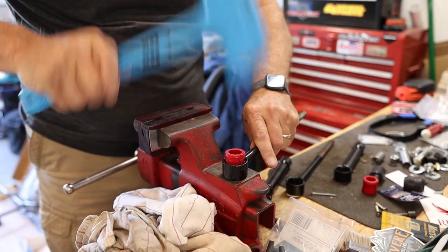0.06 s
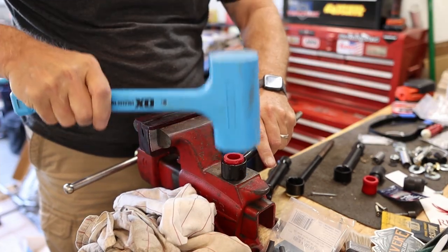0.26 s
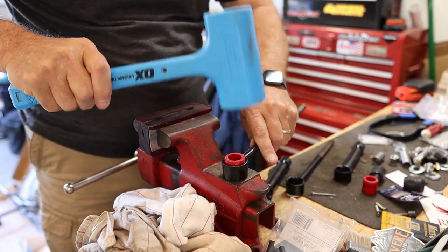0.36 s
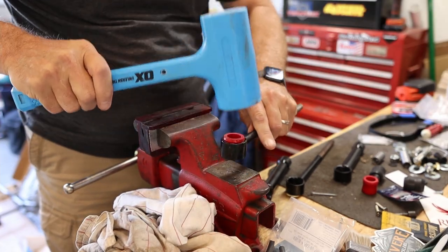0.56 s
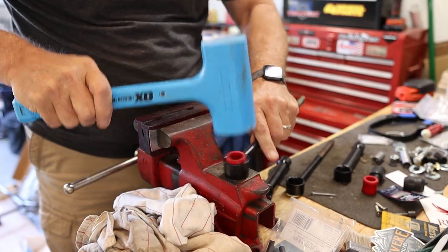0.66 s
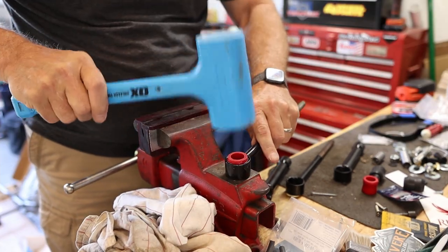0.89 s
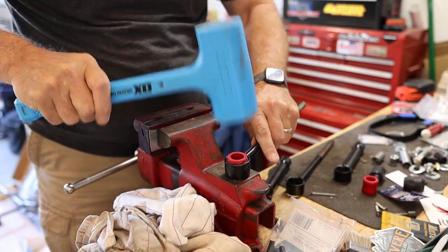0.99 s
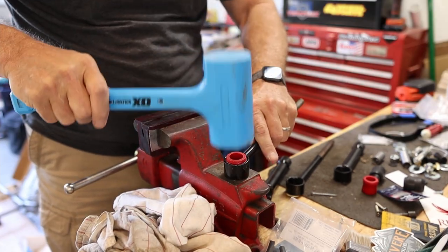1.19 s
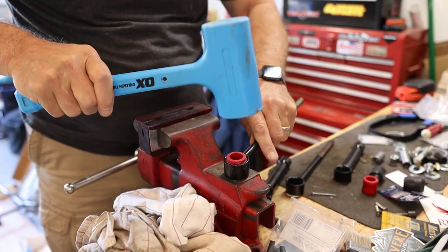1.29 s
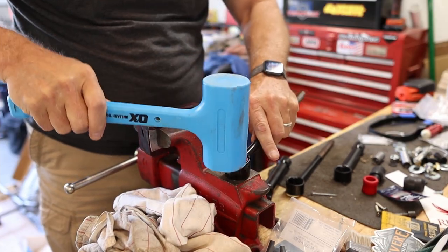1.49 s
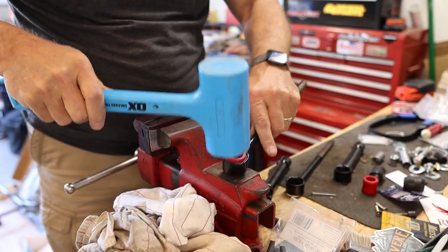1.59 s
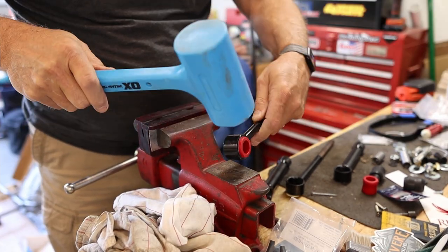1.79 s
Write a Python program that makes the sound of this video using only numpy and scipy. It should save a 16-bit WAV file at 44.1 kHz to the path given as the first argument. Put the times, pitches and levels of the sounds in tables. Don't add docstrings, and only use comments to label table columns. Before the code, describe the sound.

Hammer blows on a part clamped in a bench vise, close up in a small workshop. Shot hisses on the down-swing before a heavy, wooden thump at 0.2 s, with loud chatter and bouncing tools. A metallic clank at 0.77 s gets a dull rebound at 0.83 s. Sharp plastic cracks follow at 1.16 and 1.52 s, each trailing rattles and small knocks over faint room hum.

```python
import sys
import numpy as np
from scipy import signal
from scipy.fft import rfft, irfft
from scipy.io import wavfile

SR = 44100
rng = np.random.default_rng(int(sys.argv[2]) if len(sys.argv) > 2 else 0)


def boost(x):
    u = np.asarray(x, float) / 20
    return 10 ** u


def store_pcm(level_fs):
    pcm = np.round(np.clip(level_fs, -1, 1) * 32767).astype(np.int16)
    wavfile.write(sys.argv[1], SR, np.atleast_2d(pcm).T)


N = 81585

BLOW_SPREAD_DB, BOUNCE_SPREAD_DB = 1.5, 3
VISE_T60_S, TOOL_T60_S = .035, .009


def rms_one(x):
    return x / np.sqrt(np.mean(x ** 2) + 1e-20)


def at_hz(points, hz):
    table_hz, value = np.transpose(points)
    return np.interp(np.log(hz + 1), np.log(table_hz), value)


def low_pass(x, hz):
    return signal.sosfilt(signal.butter(4, min(hz, .45 * SR), fs=SR, output="sos"), x)


def high_pass(x, hz, order=2):
    return signal.sosfilt(signal.butter(order, hz, "high", fs=SR, output="sos"), x)


def band_pass(x, low_hz, high_hz):
    return signal.sosfilt(signal.butter(2, [low_hz, high_hz], "band", fs=SR, output="sos"), x)


def coloured(spectrum):
    hz = np.arange(N // 2 + 1) * SR / N
    return rms_one(irfft(rfft(rng.standard_normal(N)) * boost(at_hz(spectrum, hz)), N))


def clicks(start_s, level_db):
    out = np.full(N, 1e-18)
    out[(np.asarray(start_s) * SR).astype(int)] += boost(level_db)
    return out


def ring(x, hz, t60_s):
    r = boost(-60 / (max(t60_s, .002) * SR))
    w = 2 * np.pi * hz / SR
    return signal.lfilter([0, np.sin(w)], [1, -2 * r * np.cos(w), r * r], x)


def capped(modes, longest_s):
    return [(hz, db, min(t60_s, longest_s)) for hz, db, t60_s in modes]


def strike(start_s, level_db, modes, spread_db):
    vary_db = rng.normal(0, 1, (len(start_s), len(modes))) * spread_db
    out = 0
    for k, (hz, mode_db, t60_s) in enumerate(modes):
        out = out + ring(clicks(start_s, level_db + mode_db + vary_db[:, k]), hz, t60_s)
    return out


def body(x, modes):
    out = 0
    for k, (hz, db, t60_s) in enumerate(capped(modes, VISE_T60_S)):
        out = out + ring(x + 1e-18, hz, t60_s) * boost(db) * (-1) ** k
    return out


def contacts(modes):
    contacts_per_s = 1500
    train = rng.choice([-1, 1], N) * (rng.random(N) < contacts_per_s / SR)
    return train / np.sqrt(np.mean(body(train, modes) ** 2))


def swell(start_s, rise_s, t60_s, level_db):
    age_s = np.maximum(np.arange(N) / SR - start_s, 0)
    return boost(level_db - 60 * age_s / t60_s) * np.sin(np.pi / 2 * np.minimum(age_s / rise_s, 1)) ** 2


# hz, level_db
HUM_SPECTRUM = [(25, -2.5), (50, 2.5), (85, -10.5), (250, -6.5), (1030, -7.5), (2300, -13), (3600, -24),
                (16500, -44)]


def hum():
    return boost(-52) * coloured(HUM_SPECTRUM)


# start_s, peak_db
TICK_EVENTS = [(.3185, -35), (.3985, -33), (.432, -52), (.4505, -54), (.6045, -45), (.6545, -41),
               (.7025, -44), (.009, -50)]
# hz, level_db, t60_s
TICK_MODES = [(2700, -9, .006), (3700, -11, .005), (4700, -12, .004), (5600, -7, .006), (6800, -8, .005),
              (7700, -12, .004)]


def ticks():
    start_s, peak_db = np.transpose(TICK_EVENTS)
    return low_pass(strike(start_s, peak_db, capped(TICK_MODES, TOOL_T60_S / 1.4), BLOW_SPREAD_DB), 8200)


# peak_s, rise_s, fall_s, level_db, brightness_db
SHOT_SLIDES = [
    (0.128, 0.024, 0.018, -42.5, 3.5),
    (1.151, 0.048, .004, -55, 0.5),
    (1.508, 0.033, .004, -60, -18),
    (.52, 0.0078, 0.0067, -54.5, -38),
    (.212, 0.0057, 0.0036, -38.5, 2),
    (.11, 0.083, .05, -53.5, -15),
]
# hz, level_db
SHOT_SPECTRUM = [(410, -47), (700, -13), (2190, -3.5), (2400, 0.5), (2800, -9.5), (5260, -5.5),
                 (6920, -18.5), (9480, -14.5), (16000, -11.5)]


def shot():
    cavity_hz, cavity_width_hz, cavity_db = 2430, 250, -11
    grain_db, grain_hz = 3, 120
    t, out = np.arange(N) / SR, 0
    hiss = coloured(SHOT_SPECTRUM)
    hiss = hiss + boost(cavity_db) * rms_one(ring(hiss, cavity_hz, 2.2 / cavity_width_hz))
    hiss = hiss * boost(grain_db * rms_one(low_pass(rng.standard_normal(N), grain_hz)))
    dull = low_pass(hiss, 6600)
    for peak_s, rise_s, fall_s, level_db, bright_db in SHOT_SLIDES:
        width_s = np.where(t < peak_s, rise_s, fall_s)
        swing = boost(level_db) * np.exp(-.5 * ((t - peak_s) / width_s) ** 2)
        out = out + swing * dull + swing ** 2 / boost(level_db - bright_db) * (hiss - dull)
    return out


# full_contact_s, thump_db (bench), face_db (crack), steel_db (sleeve clank)
HAMMER_BLOWS = [
    (.2050, -3, -16, -15),
    (0.7705, -21, -12.5, 1),
    (0.8332, -9, -26, -21),
    (1.1554, -6.5, -0.5, -13),
    (1.5172, -8.5, -1.5, -14),
]
# hz, level_db, t60_s
BENCH_MODES = [(139.8, -18.5, 0.14), (215.3, -13, 0.078), (245.8, 2, 0.046), (328.8, -7.5, 0.055),
               (566.6, -11, .06)]
# hz, level_db, t60_s
FACE_MODES = [(1126, -0.5, 0.015), (1760, 3.5, 0.0078), (2500, 2, 0.0048), (4795, -0.5, .016),
              (5910, -3.5, 0.0094), (6800, -6, 0.0045), (8700, -1, 0.0027), (10620, -26, 0.0033),
              (10740, -15.5, .01), (13800, -16, .008), (15800, -24, .01)]
# hz, level_db, t60_s
STEEL_MODES = [(1133, -6, 0.032), (2174, 6.5, 0.0092), (2370, -0.5, 0.011), (3431, -4, 0.022),
               (4870, -7, 0.02), (5610, 0.5, 0.011), (6270, -9.5, 0.0057), (7440, -9.5, 0.0033),
               (580, -30, 0.0209), (8000, -17.5, .015), (9600, -31.5, 0.029), (10640, -12, 0.018),
               (13800, -12, .012)]


def first_touch(x):
    lead_s, touch_db = .0006, -17
    return x + boost(touch_db) * np.roll(x, -int(lead_s * SR))


def bench_thump(start_s, thump_db):
    lag_s, contact_hz, low_hz = 0.00028, 720, 107
    thump = strike(start_s + lag_s, thump_db, BENCH_MODES, BLOW_SPREAD_DB)
    return high_pass(low_pass(thump, contact_hz), low_hz)


def floor_rumble(start_s, thump_db):
    hz, t60_s, level_db = 69, .4, -29.5
    once = ring(clicks(start_s, thump_db + level_db), hz, t60_s)
    return ring(once, hz, t60_s) * 7 / (t60_s * SR)


def face_crack(start_s, face_db):
    crack = strike(start_s, face_db - 4.5, capped(FACE_MODES, .013), BLOW_SPREAD_DB)
    return high_pass(first_touch(crack), 300)


def sleeve_clank(start_s, steel_db):
    longest_s, contact_hz = .016, 9600
    modes = []
    for k, (hz, db, t60_s) in enumerate(STEEL_MODES):
        modes.append((hz, db, min(t60_s, longest_s * (2.5 if k == 3 else 1))))
    clank = low_pass(strike(start_s, steel_db - 6.5, modes, BLOW_SPREAD_DB), contact_hz)
    return high_pass(first_touch(clank), 300)


def blows():
    start_s, thump_db, face_db, steel_db = np.transpose(HAMMER_BLOWS)
    thump = bench_thump(start_s, thump_db)
    rumble = floor_rumble(start_s, thump_db)
    return face_crack(start_s, face_db), sleeve_clank(start_s, steel_db) - thump + rumble


# start_s, rise_s, t60_s, level_db, top_hz
CHATTER_SWELLS = [
    (0.2065, 0.0019, 0.078, -8.5, 2200),
    (0.243, .03, 0.31, -22.5, 2400),
    (0.768, 0.00094, 0.056, -21, 3000),
    (.832, 0.007, 0.1, -14.5, 1800),
    (1.1525, 0.0027, 0.11, -16.5, 2200),
    (1.191, 0.0069, 0.31, -30, 3000),
    (1.518, 0.0037, 0.094, -13.5, 2200),
    (1.552, 0.019, 0.29, -27, 3000),
]
# hz, level_db, t60_s
VISE_MODES = [(398.6, -10, 0.034), (519, -0.5, 0.022), (609.3, 0, 0.02), (709, -3.5, 0.028),
              (964.4, 0.5, 0.017), (1035, -3, 0.21), (1125, 0, 0.017), (1408, 1.5, 0.013),
              (1596.5, -7, 0.026), (1664, -6.5, 0.054), (1921, -0.5, 0.017), (2098, 0, 0.013),
              (2353, -3, 0.013), (2552, -11, 0.09)]


def chatter():
    train, drive = contacts(VISE_MODES), 0
    for start_s, rise_s, t60_s, level_db, top_hz in CHATTER_SWELLS:
        drive = drive + low_pass(train * swell(start_s, rise_s, t60_s, level_db + 3.5), top_hz)
    return body(drive, VISE_MODES)


# start_s, rise_s, t60_s, level_db
RATTLE_SWELLS = [
    (0.2065, 0.0069, 0.019, -26.5),
    (0.211, 0.12, 0.34, -28),
    (0.83, 0.0014, 0.18, -29),
    (1.155, 0.0031, 0.31, -29.5),
    (1.516, 0.0033, 0.27, -25),
    (1.334, 0.0023, 0.041, -69),
    (1.681, .002, 0.053, -77),
]
# hz, level_db, t60_s
TOOL_MODES = [(2716, 3, 0.01), (3110, 1, 0.0075), (3700, -7.5, 0.0067), (4380, -2, 0.0081),
              (5300, -13, 0.0079), (5720, -3.5, .006), (6570, -9, 0.009), (7280, -9, 0.0047),
              (9300, -16, 0.0026), (11100, -33, 0.0044)]
# peak_s, spread_s, level_db
JINGLE_SWELLS = [
    (.262, .01, -68),
    (.297, .006, -65),
]


def rattle():
    jingle_hz, jingle_t60_s = 10850, .022
    tools = capped(TOOL_MODES, TOOL_T60_S)
    shaking = sum(swell(*row) for row in RATTLE_SWELLS)
    buzz = high_pass(body(contacts(tools) * shaking, tools), 2200)
    t = np.arange(N) / SR
    song = rms_one(ring(rng.standard_normal(N), jingle_hz, jingle_t60_s))
    rocking = sum(boost(db) * np.exp(-.5 * ((t - peak_s) / spread_s) ** 2) for peak_s, spread_s, db in JINGLE_SWELLS)
    return buzz + song * rocking


# start_s, peak_db, hardness_db
TOOL_BOUNCES = [(0.273, -31.5, 18.5), (0.302, -13.5, -1), (0.383, -23.5, 0.5), (0.413, -26, -7),
                (0.439, -27.5, -21), (0.453, -33, 0), (0.469, -37, -29), (0.489, -40, -23),
                (0.941, -28, -14), (0.964, -29, -30), (0.987, -49, -7), (1.24, -44, -36),
                (1.257, -18, -4.5), (1.335, -22.5, -2), (1.354, -36.5, -1.5), (1.376, -27, -26),
                (1.394, -33, -4.5), (1.429, -43, -12), (1.572, -24, -20), (1.625, -18, -41),
                (1.683, -23.5, -3.5), (1.713, -69, -15), (1.743, -34, -9), (1.78, -44, -24)]


def bounces():
    knock_hz, knock_t60_s, knock_db = 252.4, 0.051, -3
    start_s, peak_db, hard_db = np.transpose(TOOL_BOUNCES)
    knock = band_pass(ring(clicks(start_s, peak_db + knock_db), knock_hz, knock_t60_s), 170, 420)
    modes = [(hz, db, VISE_T60_S / 2) for hz, db, _ in VISE_MODES]
    clatter = strike(start_s, peak_db + hard_db - 10.5, modes, BOUNCE_SPREAD_DB)
    smear = rng.standard_normal(350) * np.hanning(350) / 12
    return knock + band_pass(signal.fftconvolve(clatter, smear)[:N], 400, 2300)


# hz, t60_s
ROOM_DECAY = [(100, 0.18), (300, 0.31), (1000, 0.35), (3000, 0.31), (7000, 0.32), (15000, 0.34)]


def room(x):
    level_db, start_s = -9.5, 0.0014
    t, tail = np.arange(SR // 2) / SR, 0
    edges_hz = 60 * 2 ** np.arange(0, 8.3, .5)
    white = rng.standard_normal((2, len(t)))
    for k, (low_hz, high_hz) in enumerate(zip(edges_hz, edges_hz[1:])):
        t60_s = at_hz(ROOM_DECAY, np.sqrt(low_hz * high_hz))
        tail = tail + band_pass(white[k % 2], low_hz, high_hz) * boost(-60 * t / t60_s)
    tail = tail * np.clip(t / start_s - 1, 0, 1)
    return boost(level_db) * signal.fftconvolve(x, tail / np.sqrt(np.sum(tail ** 2)))[:N]


def scene():
    face_wall_db, mic_low_hz = -9, 50
    face, rest = blows()
    rest = rest + chatter() + rattle() + bounces() + shot()
    near = face + ticks() + rest + room(rest + boost(face_wall_db) * face)
    return (high_pass(near, mic_low_hz, order=4) + hum())[None]


def top_cut(x):
    return signal.sosfilt(signal.butter(12, 16820, fs=SR, output="sos"), x)


def record(dry):
    clip_top, mic_top_hz = .67, 15750
    mix = dry / (1 + np.abs(dry / clip_top) ** 8) ** (1 / 8)
    mix = signal.sosfilt(signal.ellip(6, 1, 30, mic_top_hz, fs=SR, output="sos"), mix)
    return top_cut(mix)


dry = scene()
out = record(dry)
store_pcm(out)
```